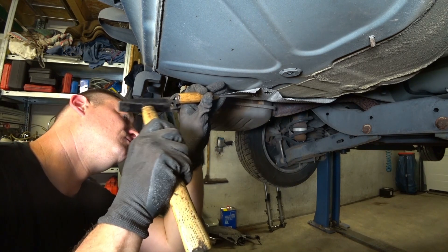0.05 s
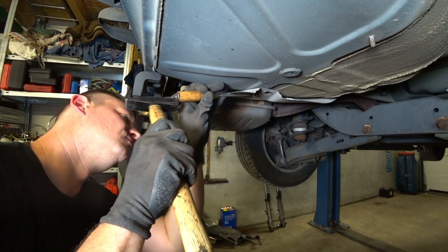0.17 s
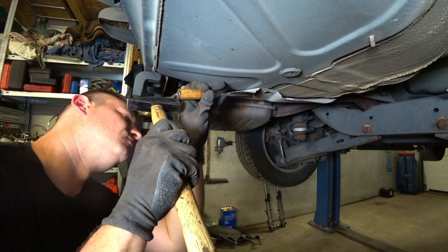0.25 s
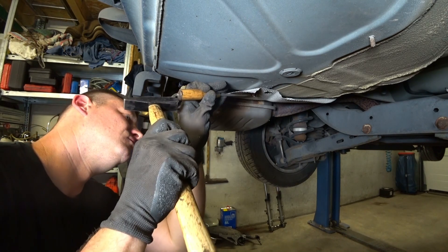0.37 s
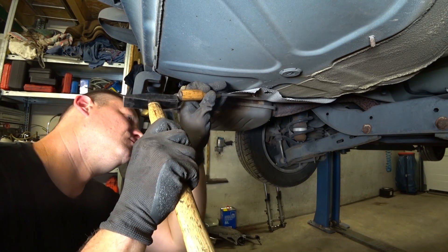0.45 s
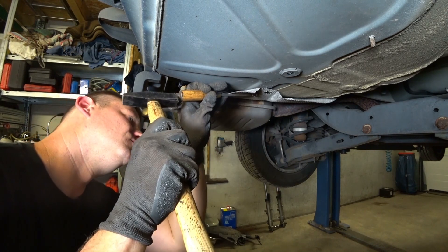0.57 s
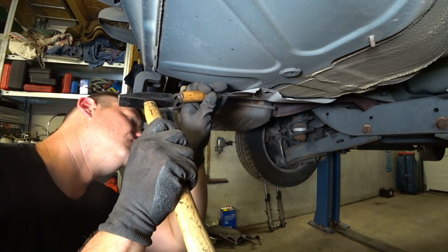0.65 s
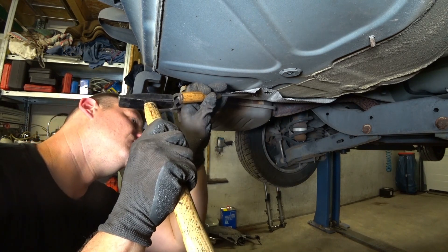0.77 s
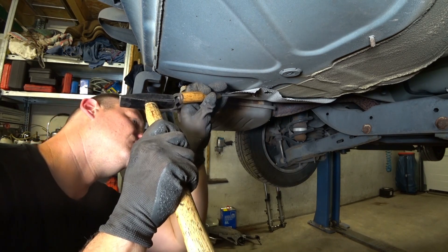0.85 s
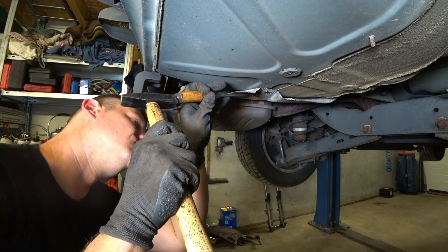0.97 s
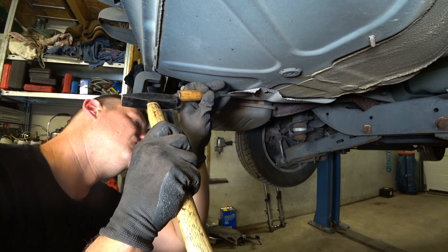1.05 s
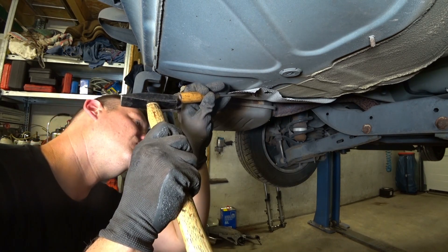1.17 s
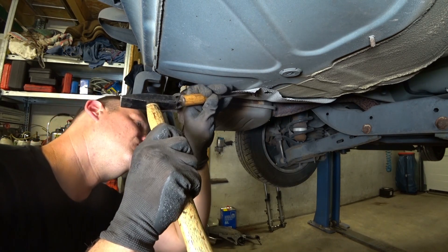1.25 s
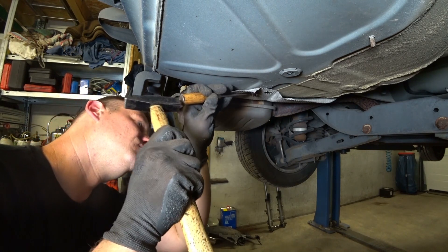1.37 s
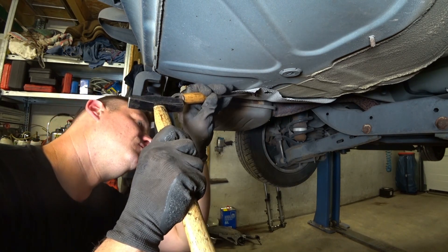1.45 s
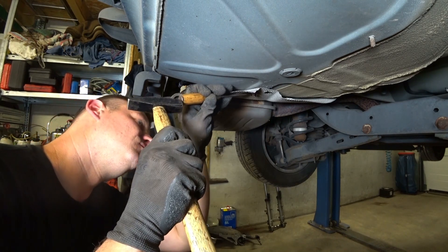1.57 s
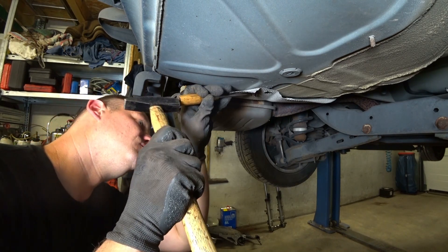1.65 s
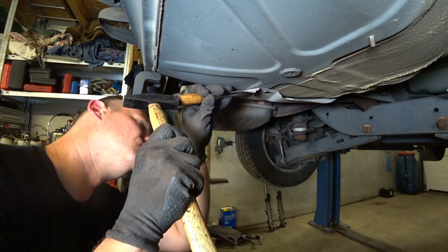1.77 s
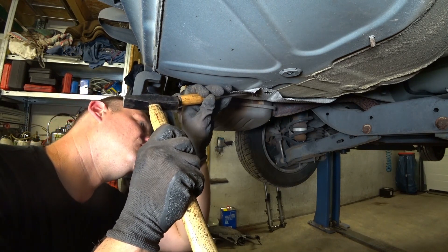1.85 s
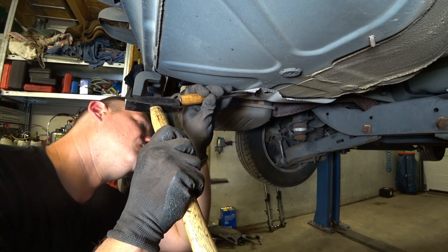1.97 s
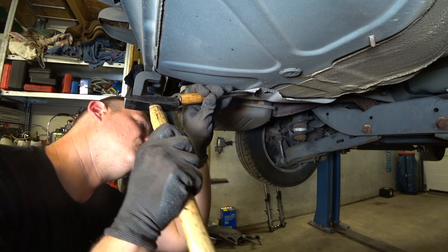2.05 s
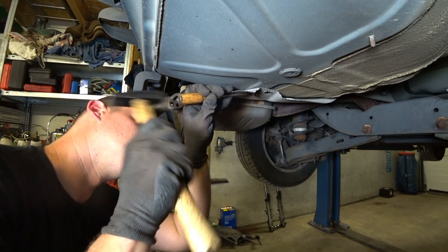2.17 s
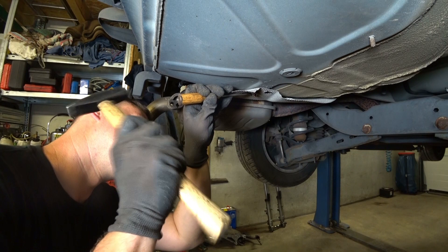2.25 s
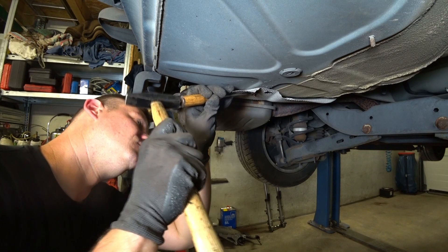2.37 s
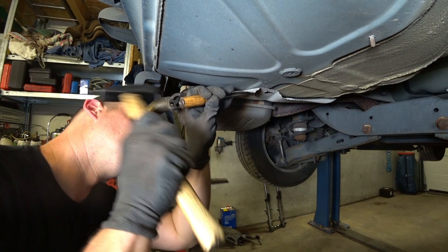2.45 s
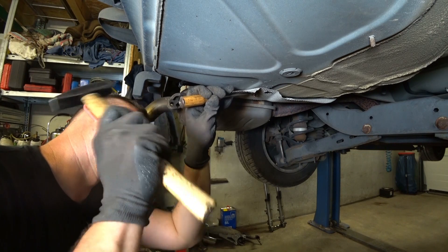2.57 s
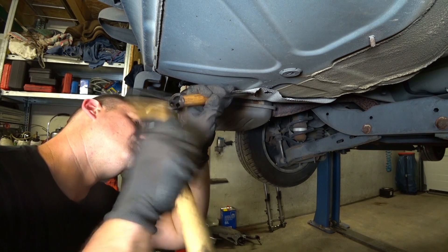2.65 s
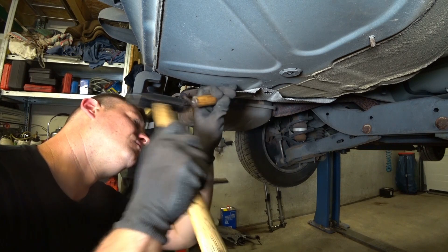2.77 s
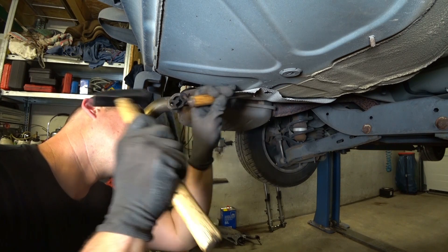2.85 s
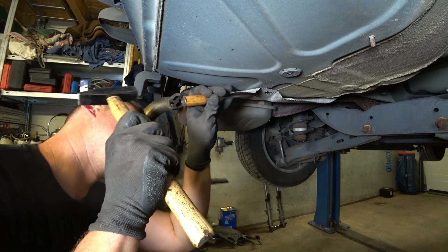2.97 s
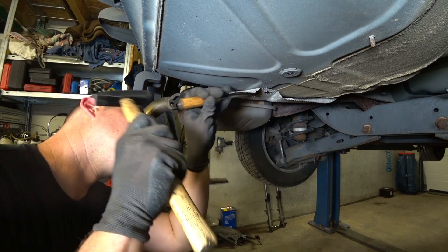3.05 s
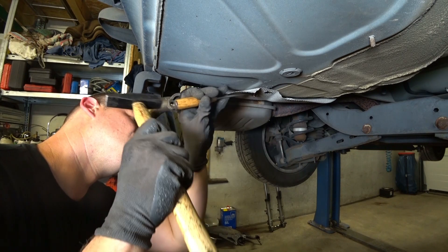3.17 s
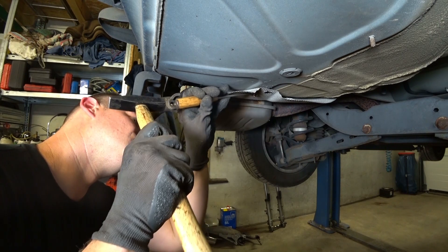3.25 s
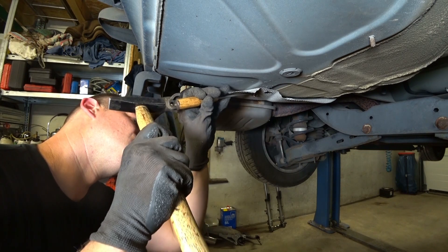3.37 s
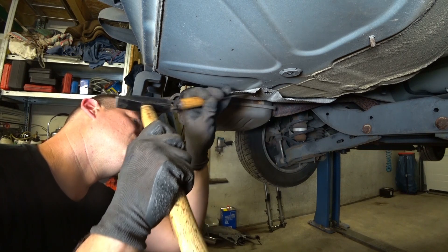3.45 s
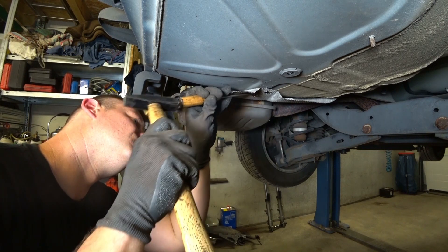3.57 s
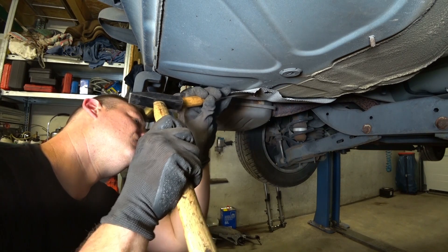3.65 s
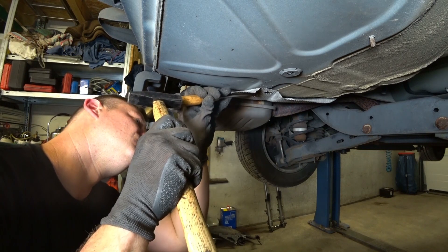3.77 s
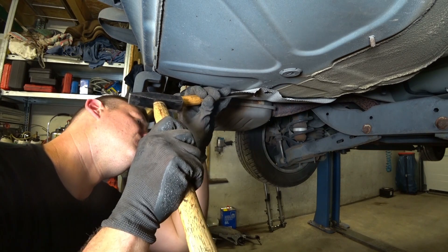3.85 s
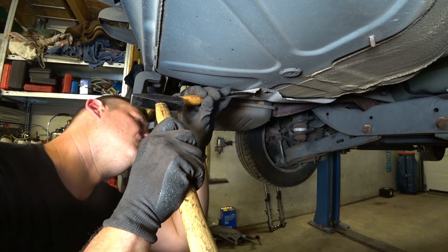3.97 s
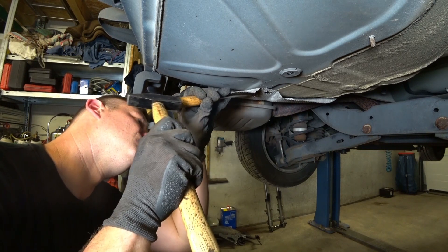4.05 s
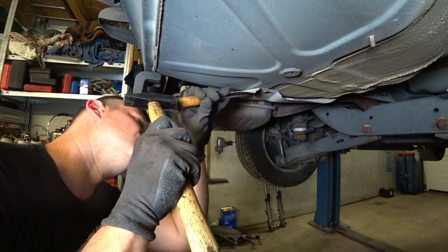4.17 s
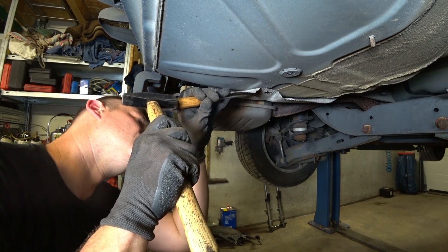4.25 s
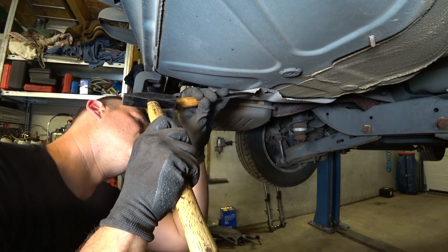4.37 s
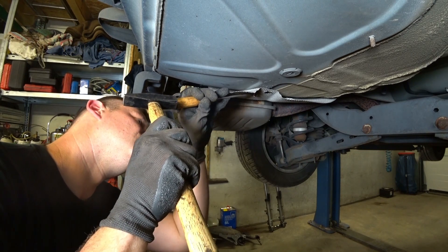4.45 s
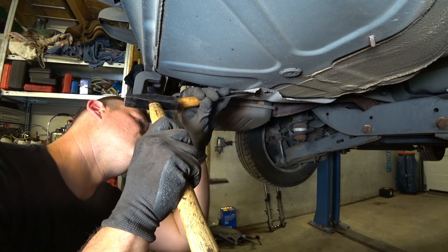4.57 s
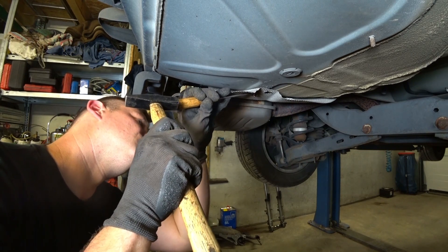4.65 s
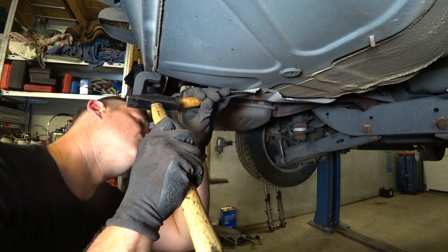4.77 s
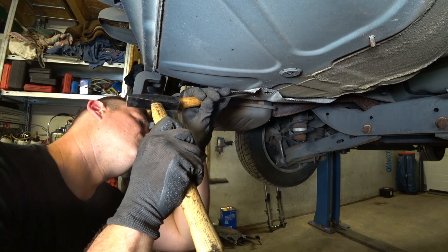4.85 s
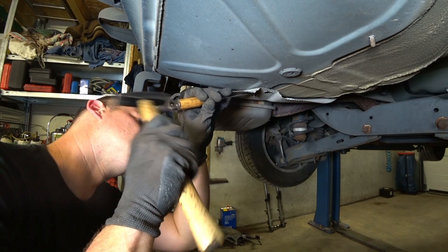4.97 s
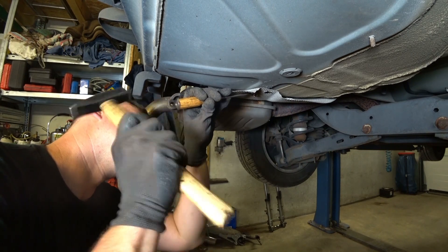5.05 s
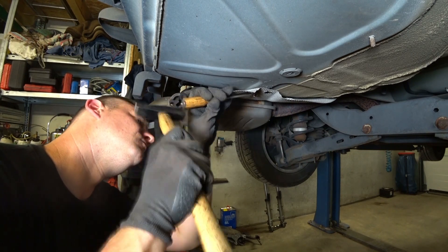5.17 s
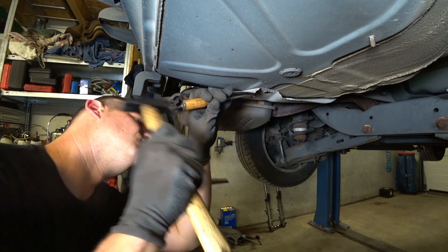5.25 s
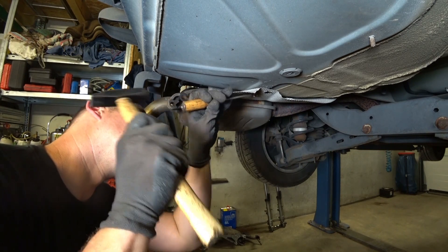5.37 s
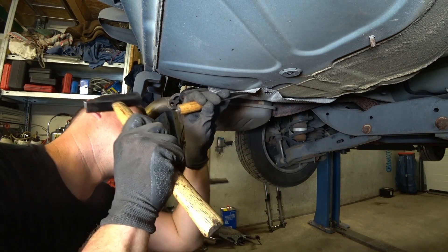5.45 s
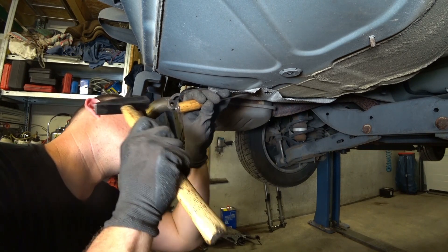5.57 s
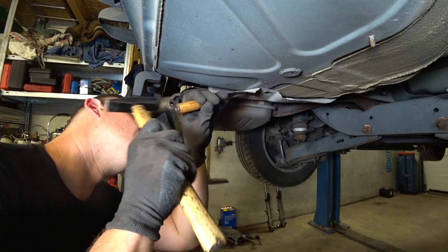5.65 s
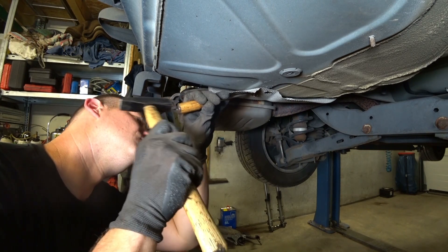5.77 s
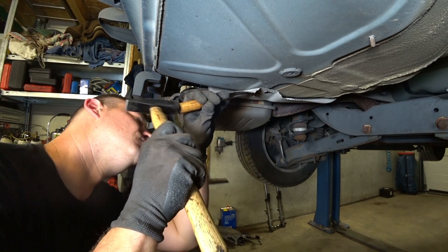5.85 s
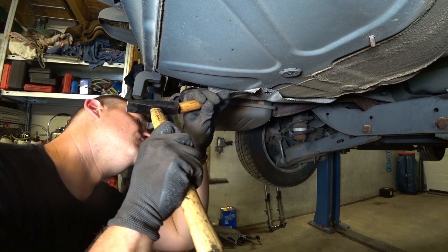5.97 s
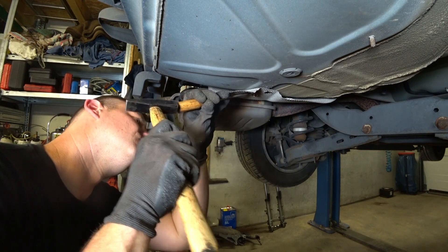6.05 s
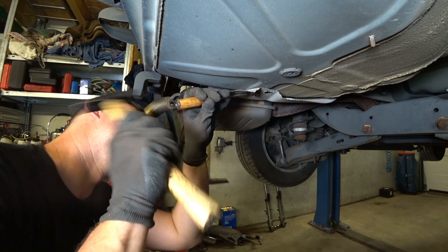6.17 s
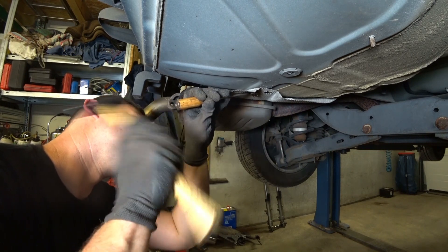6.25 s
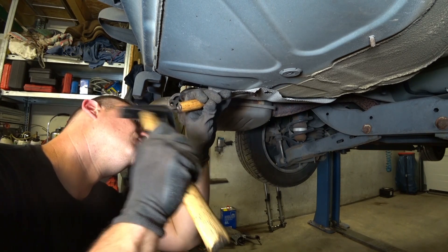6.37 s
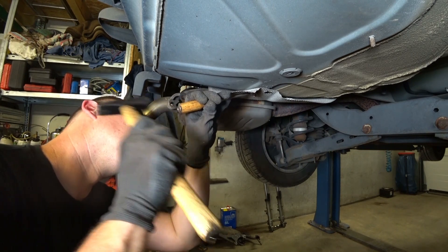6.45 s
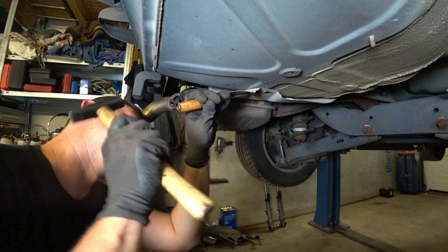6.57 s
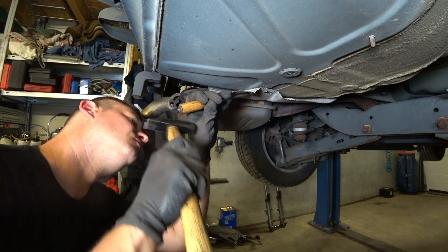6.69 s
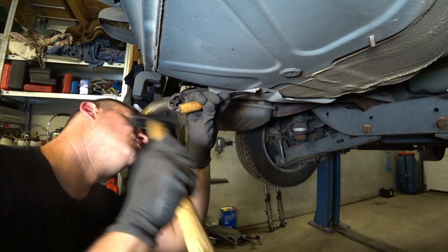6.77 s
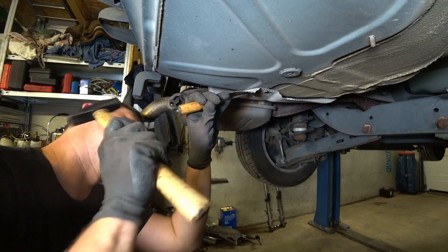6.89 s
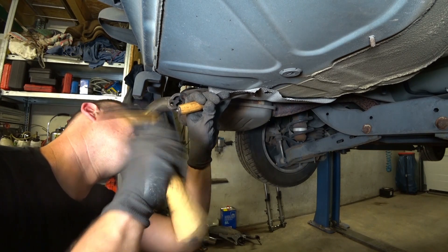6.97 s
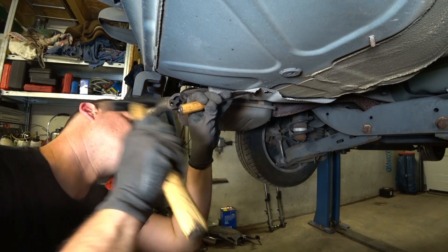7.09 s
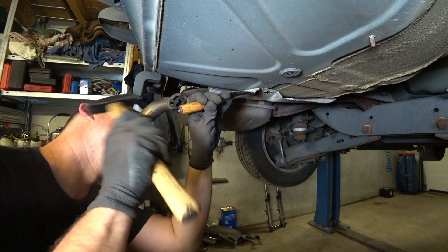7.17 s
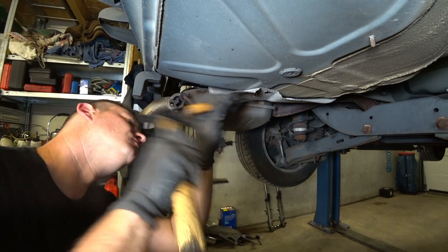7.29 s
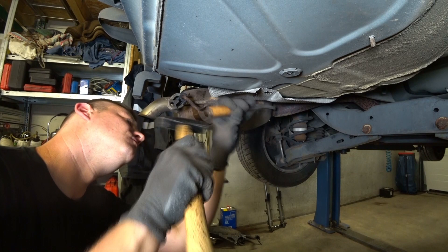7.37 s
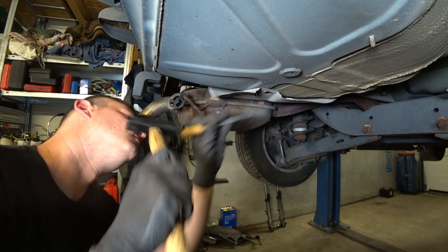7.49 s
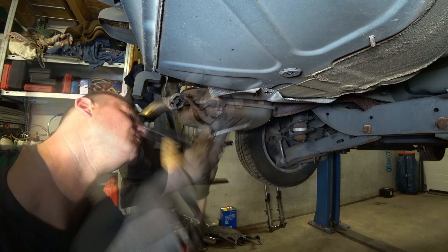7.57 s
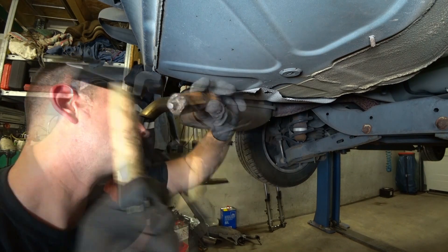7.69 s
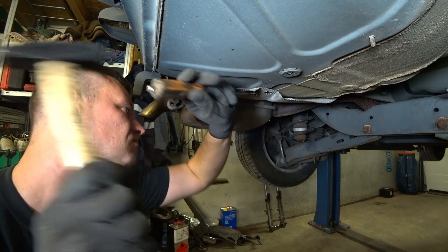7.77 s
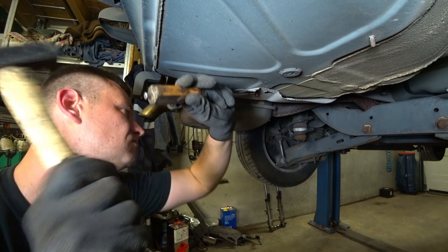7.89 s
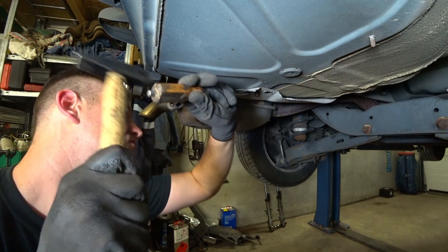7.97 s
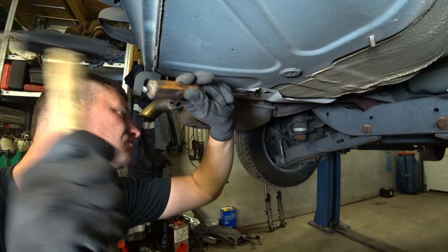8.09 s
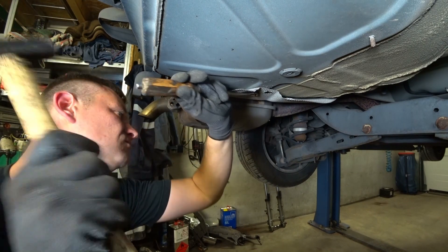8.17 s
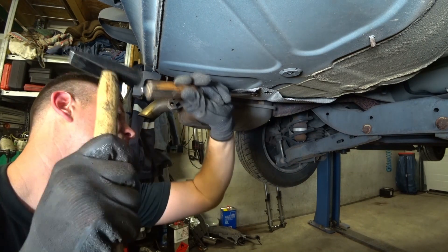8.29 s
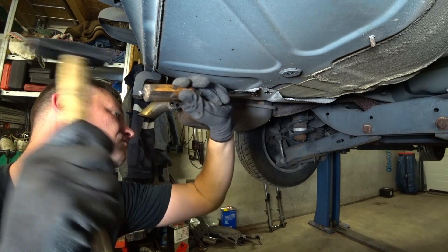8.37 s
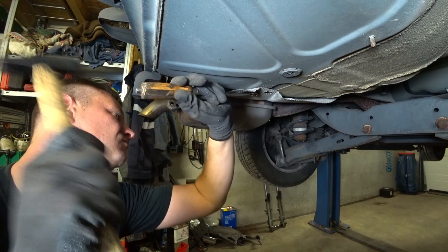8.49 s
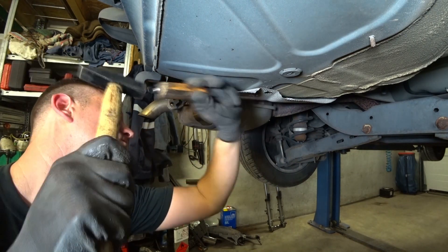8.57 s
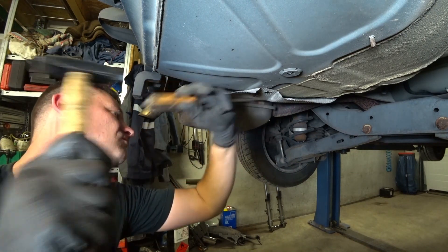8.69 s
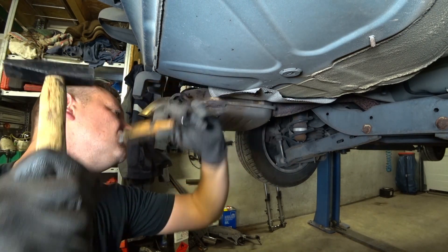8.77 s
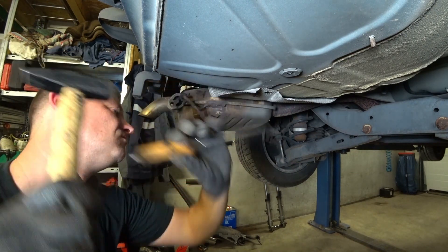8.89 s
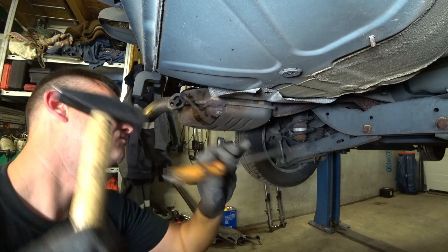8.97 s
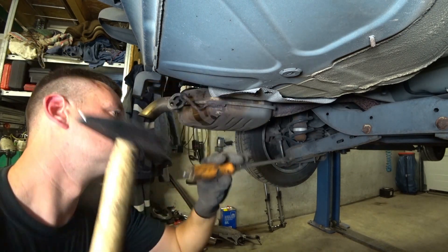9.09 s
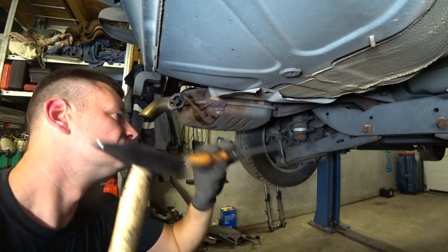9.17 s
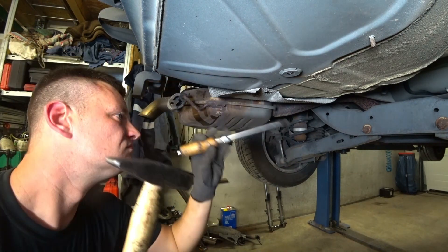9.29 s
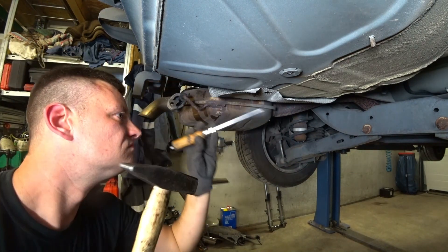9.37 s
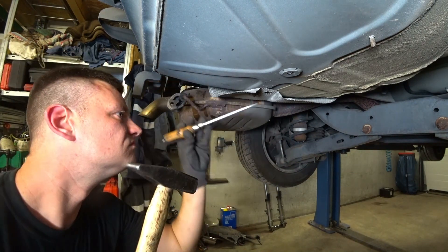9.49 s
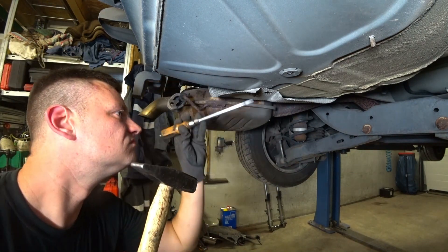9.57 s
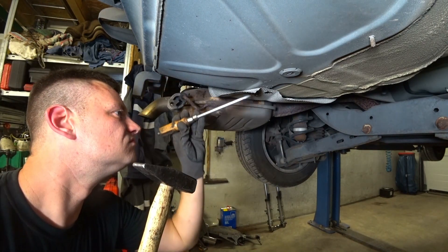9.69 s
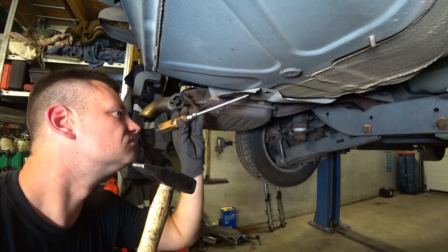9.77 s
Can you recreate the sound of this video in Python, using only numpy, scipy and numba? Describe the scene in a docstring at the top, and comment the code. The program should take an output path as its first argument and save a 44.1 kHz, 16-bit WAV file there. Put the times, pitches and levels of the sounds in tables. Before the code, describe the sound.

A hammer drives a chisel into a car's thin floor panel, with ringing metallic crashes and smaller knocks and scrapes between blows.

```python
"""Under a car in a workshop, camera microphone close to a thin floor panel.
A hammer drives a chisel into the sheet: steel cracks on steel, the panel crashes, the car body booms.
Between the runs of blows the chisel is rocked and levered in the cut, and the sheet knocks and scrapes.
A gloved hand bumps dully; the workshop's murk lies behind. At this range a hard blow clips briefly,
then the camera's gain control holds the ringing panel level until it dies away."""
import sys
import numpy as np
from scipy import signal
from scipy.fft import rfft, irfft, next_fast_len
from scipy.io import wavfile
from scipy.ndimage import map_coordinates
from numba import njit

SR = 44100
rng = np.random.default_rng(int(sys.argv[2]) if len(sys.argv) > 2 else 0)


def unload_wav(signal):
    """Save mono or channel-first audio to the path in sys.argv[1] as 16-bit WAV at rate SR, clipped to [-1, 1]."""
    wavfile.write(
        sys.argv[1],
        SR,
        np.round(np.clip(np.atleast_2d(signal).T, -1, 1) * 32767).astype(np.int16),
    )


N = 433503
RING_T = np.arange(round(1.3 * SR)) / SR  # t/s of one impact's ring


def amp(db):
    """Decibels to gain."""
    return 10 ** (np.asarray(db) / 20)


def unit(x):
    """Scale to rms 1."""
    return x / np.sqrt(np.mean(x ** 2) + 1e-20)


def along(points, hz):
    """Read (f/Hz, value) points on a log axis."""
    f, value = np.transpose(points)
    return np.interp(np.log(hz + 1), np.log(f), value)


def filtered(x, response):
    """x times a gain that depends on frequency."""
    size = next_fast_len(len(x) + 8192)
    return irfft(rfft(x, size) * response(np.fft.rfftfreq(size, 1 / SR)), size)[:len(x)]


def noise(spectrum, size=len(RING_T)):
    """Noise of rms 1, shaped by (f/Hz, level/dB) points."""
    return unit(filtered(rng.standard_normal(size), lambda hz: amp(along(spectrum, hz))))


def fade(t60, t=RING_T):
    """Exponential decay by 60 dB in t60 seconds."""
    return np.exp(-np.log(1000) * t / np.maximum(t60, 1e-3))


def add(track, s, sound):
    """Mix a sound into the track at s seconds."""
    start = max(round(s * SR), 0)
    track[start:start + len(sound)] += sound[:N - start]


# Room tone under the car: t/s, level/dB
MURK_LEVEL = [(0, -43), (2.2, -45), (4.5, -48), (6.2, -47), (9.1, -41), (9.83, -41.5)]
# Spectra of its murk and hiss: f/Hz, level/dB
MURK_SPECTRUM = [(25, -13), (70, -13), (150, -10), (212, -3), (290, -9), (400, -5), (1160, -5), (2000, -17),
                 (3250, -30), (8000, -55)]
HISS_SPECTRUM = [(300, -10), (2500, 0), (4600, -1), (7000, -6), (16000, -12)]

def room():
    """The workshop behind the close sounds: low murk, wavering a little, over a faint steady hiss."""
    t = np.arange(N) / SR
    waver_db = 1.3 * map_coordinates(rng.standard_normal(90), [t * 8])
    murk = amp(np.interp(t, *np.transpose(MURK_LEVEL)) + waver_db) * noise(MURK_SPECTRUM, N)
    return murk + amp(-58.5) * noise(HISS_SPECTRUM, N)


# The panel's ranges (thud, body, middle, clang, zing, sizzle): f/Hz
RANGE_HZ = [190, 460, 1100, 2600, 4900, 9500]

def contact_colour(centre_hz, thud, body, clang, zing, sizzle, focus_db, uneven_db):
    """One contact point's tint, dB against Hz: broad ranges, a local resonance and uneven peaks."""
    ranges = list(zip(RANGE_HZ, [thud, body, 0, clang, zing, sizzle]))
    peaks = rng.standard_normal(600)

    def tint(hz):
        local = focus_db * (np.exp(-(np.log((hz + 1) / centre_hz) / .22) ** 2) - .3)
        ripple = np.interp(55 * np.log1p(hz / 900), np.arange(len(peaks)), peaks)
        depth_db = uneven_db * along([(300, 1), (1300, .72), (3000, 1), (8000, .61)], hz)
        return along(ranges, hz) + local + depth_db * ripple
    return tint


# The floor panel's dense modes: f/Hz, level/dB
SHEET_SPECTRUM = [(40, -30), (70, -9.5), (110, -17.5), (160, -11.5), (207, -3.5), (294, -13.5), (360, -5.5),
                  (650, -6), (820, -3), (1300, -4), (2000, -11.5), (3580, -18.5), (5460, -20), (13600, -34),
                  (16000, -68)]
# Their ring times: f/Hz, t60/s
SHEET_T60 = [(100, 1.12), (400, 0.89), (1100, 0.74), (2900, 0.86), (7700, 0.71), (14000, 0.57)]

def sheet(tint):
    """The panel's countless modes merge into a noise whose treble dies first."""
    dense = filtered(noise(SHEET_SPECTRUM), lambda hz: amp(tint(hz)))
    hz, t, bands = signal.stft(dense, SR, nperseg=256)
    decay = fade(along(SHEET_T60, hz)[:, None], t)
    return signal.istft(bands * decay, SR, nperseg=256)[1][:len(RING_T)]


# The blade slipping along the sheet; the long row at 7.629 s is a blow that swells in without a sharp crack,
# played the same way: t/s, length/s, level/dB, treble/dB
SCRAPES = [(0.076, 0.05, -38.5, -3), (0.234, .22, -27, -8), (1.21, 0.076, -30, -6),
           (1.598, 0.0245, -24, -9.5), (4.029, 0.054, -30.5, -5), (4.306, .076, -40, -2.5),
           (7.629, .245, -15.5, -5)]

def scrapes(slips_per_s=1600):
    """Dense, uneven slips of the blade keep the panel ringing."""
    out = np.zeros(N)
    for s, length, db, treble in SCRAPES:
        size = round(length * SR)
        tint = contact_colour(1120, -8.5, 1, treble - 1, treble, treble - 6, focus_db=3.5, uneven_db=3)
        slips = rng.standard_normal(size) * (rng.random(size) < slips_per_s / SR)
        slips *= signal.windows.tukey(size, .3)
        rasp = signal.fftconvolve(slips, sheet(tint) * (fade(.14) + amp(-5)))
        add(out, s, amp(db) * rasp / (np.std(rasp[:size]) + 1e-9))
    return out


def modes(table, tint, scatter_db, drift):
    """Damped sines, each struck at a new strength; the pitch wanders slightly as the metal flexes."""
    hz, db, t60 = np.transpose(table)
    gains = amp(db + tint(hz) + scatter_db * rng.standard_normal(len(hz)))
    knots = np.linspace(0, RING_T[-1], 60)
    out = np.zeros(len(RING_T), np.float32)
    for f, gain, life in zip(hz, gains, t60):
        wander = np.cumsum(drift * f * rng.standard_normal(len(knots))) * knots[1] + rng.random()
        phase = 2 * np.pi * (f * RING_T + np.interp(RING_T, knots, wander))
        out += gain * np.sin(phase.astype(np.float32)) * fade(life)
    return out


# The floor panel's strong modes: f/Hz, level/dB, t60/s
PANEL_MODES = [(136.6, -26.5, 1.3), (193.7, -10.5, 0.5), (214.8, -10.5, 0.52), (272.6, -21.5, 1.1),
               (353.4, -23, 1.54), (441, -13, 0.61), (516.6, -18, 0.87), (591.4, -17, 0.99),
               (697, -57, 0.29), (840, -15, 0.48), (977, -49, 1), (1008, -17.5, 0.44), (1200, -10.5, 0.5),
               (1228, -18.5, 0.63), (1450, -16, 0.18), (1510, -13, 0.41), (1660, -22.5, 0.86),
               (1763, -11.5, 0.36), (2030, -15, 0.29), (2200, -37, 0.17), (2660, -20, 0.61),
               (2900, -32, 1.1)]

def panel_tones(tint, scatter_db, drift):
    """The separate pitches that stand out of the struck panel's ring."""
    return modes(PANEL_MODES, tint, scatter_db, drift)


def blade(centre_hz, width_hz=480):
    """A cluster of close modes where the blade bites the sheet."""
    white = rng.standard_normal(len(RING_T))
    return unit(filtered(white, lambda hz: np.exp(-((hz - centre_hz) / width_hz) ** 2)))


# The chisel levered in the cut, close by; the row at 5.855 s is a light hammer tap and the one at 5.442 s a
# swelling scrape, played the same way: t/s, level/dB, resonance f/Hz, thud/dB, brightness/dB
KNOCKS = [(0.185, -20.5, 804, -2.5, -26), (0.289, -38.5, 1100, -21, 5), (0.42, -11.5, 1600, -18, -17),
          (0.51, -23.5, 1670, -18, -9), (.688, -14, 1310, -14, -13), (.889, -27, 1680, -14, -20),
          (.941, -8.5, 1460, -15, -9), (1.238, -22, 1140, -13, -19.5), (1.457, -15, 1510, -16, -33),
          (1.618, -13.5, 1080, -12.5, -13.5), (1.725, -19.5, 800, -8, -26.5), (1.89, -29.5, 770, -31, -17),
          (1.946, -12, 1960, -10, -21), (2.12, -23.5, 1240, -23, -28.5), (3.113, -15, 1620, -23, -9.5),
          (3.188, -17.5, 1540, -13, -18.5), (3.222, -19, 1070, -1, -29), (3.454, -12.5, 916, -35, -14),
          (3.694, -29, 1030, 4, -9), (4.048, -31, 1230, -18, -25), (4.615, -22, 690, -9, -60),
          (4.768, -34.5, 605, 25, -46), (4.9104, -21, 960, -14, -11.5), (5.442, -15.5, 1230, -11.5, -16.5),
          (5.654, -17, 1160, -4, -16.5), (5.756, -21.5, 1100, -6, -18.5), (5.788, -18.5, 1130, -11, -26),
          (5.816, -31, 1380, 1, -4), (5.855, -21, 1480, 9.5, 1.5), (8.115, -44, 690, -4, 20.5),
          (8.18, -17, 1170, -16, -9.5), (9.645, -23.5, 497, 11, -1.5), (9.738, -31, 1200, 4, 3)]

def knocks():
    """The sheet creaks, then snaps against the blade: a tick, a short clank and a weaker ring."""
    out = np.zeros(N)
    lead = round(.03 * SR)
    for s, db, centre_hz, thud, bright in KNOCKS:
        ring_db = -9 + .3 * min(bright + 19.5, 0)  # a dull knock rings less
        tint = contact_colour(centre_hz, thud, body=2.5 + .29 * thud, clang=8 + .79 * bright,
                              zing=bright, sizzle=-2.5 + 1.05 * bright, focus_db=7, uneven_db=5)
        dense = sheet(tint)
        clank = dense * (amp(3) * fade(.011) + fade(.27) + amp(ring_db + .5))  # jolt, clank, tail
        tones = panel_tones(tint, scatter_db=2.5, drift=.0045) * (fade(.2) + amp(ring_db + 7))
        edge = amp(-18 + min(bright, 0)) * blade(4400) * fade(.69)  # bright knocks wake the blade
        treble = noise([(800, -20), (2500, -11.5), (7000, -10), (15000, -22)])
        tick = amp(-.5) * filtered(treble, lambda hz: amp(tint(hz))) * fade(.062)
        creak = amp(-8.5) * (dense * fade(.028))[:lead][::-1]  # swells up to the snap
        snap = (clank + tones + edge) * (1 - fade(.005)) + tick
        add(out, s - lead / SR, amp(db) * np.concatenate([creak, snap]))
    return out


# Thin tones of hammer head and chisel shank, deep tones of the car body: f/Hz, level/dB, t60/s
STEEL_MODES = [(2509, -37, .5), (2773, -36, .5), (8230, -49, .6), (8995, -49, .6), (9528, -43, .7),
               (11754, -46, .65)]
CAR_BODY_MODES = [(83, -22.5, 1.5), (86.5, -31, 1.0), (72, -35, 1.0)]
# Hammer blows at close range; grip is how firmly the blade sits in the sheet:
# t/s, level/dB, resonance f/Hz, thud/dB, brightness/dB, grip/dB, blade f/Hz
BLOWS = [(2.3307, 5, 814, 4.5, -3.5, 8, 4490), (2.6774, 15.5, 1115, -16.5, -11, -16, 4400),
         (3.458, 0, 1250, -11, -15, -26, 4520), (5.145, 7, 890, -1, -4.5, 2, 4480),
         (6.2795, 4, 830, 3, -3, 4, 4460), (6.6588, 2, 770, 4.5, -14.5, 6.5, 4260),
         (6.9935, 1.5, 1030, 0.5, -0.5, 1.5, 4320), (7.2971, -2, 960, 4.5, 3.5, -16, 4060),
         (7.959, 1, 740, -.5, -15, -3, 4630), (8.253, 5, 870, -5.5, -4, -41, 4140),
         (8.5358, 3, 1090, -1.5, -1, -35, 4380)]

def blows():
    """Steel cracks on steel, the panel crashes; a firmly seated blade rings and makes the car boom."""
    out = np.zeros(N)
    for s, db, centre_hz, thud, bright, grip, blade_hz in BLOWS:
        tint = contact_colour(centre_hz, thud, body=1.1 + .49 * thud, clang=4 + .8 * bright,
                              zing=bright, sizzle=bright, focus_db=5, uneven_db=3.5)
        burst = noise([(80, -60), (400, -55), (1200, 22), (3000, 7), (7000, -2.5), (15000, -28)])
        crack = amp(10) * burst * fade(.0094)
        deep_db = .28 * min(grip, 0)  # a loose blade hardly stirs the panel's deepest range
        dense = sheet(lambda hz: tint(hz) + along([(80, deep_db), (200, 0)], hz))
        crash = dense * (1 + amp(7) * fade(.043))
        tones = amp(-.5) * panel_tones(tint, scatter_db=1, drift=.0064)
        shank = modes(STEEL_MODES, tint, scatter_db=3, drift=.003)
        edge = amp(-10.5 + 1.26 * bright + .24 * grip) * blade(blade_hz) * fade(.93)
        # the boom is too deep to depend on the contact point
        boom = amp(grip) * modes(CAR_BODY_MODES, np.zeros_like, scatter_db=1, drift=.01)
        add(out, s, amp(db - 6) * (crack + crash + tones + shank + edge + boom))
    return out


# The gloved hand against the panel: t/s, level/dB
GLOVE_BUMPS = [(4.828, -31), (9.457, -24), (9.491, -26.5), (9.71, -23)]

def glove_bumps():
    """A soft contact stirs only the panel's low range, briefly."""
    out = np.zeros(N)
    for s, db in GLOVE_BUMPS:
        thump = noise([(100, -13), (210, 11), (290, 1), (500, -32), (6000, -64)])
        add(out, s, amp(db) * thump * fade(.12) * (1 - fade(.018)))
    return out


def scene():
    """Everything that reaches the one microphone under the car."""
    return (blows() + knocks() + scrapes() + glove_bumps() + room())[None]


@njit
def gain_control(x, limit, duck_db_per_s, recover_db_per_s):
    """The camera's gain in dB: it falls fast while the output is over the limit and climbs back slowly."""
    gain_db, now = np.zeros(len(x)), 0.
    for i in range(len(x)):
        if abs(x[i]) * 10 ** (now / 20) > limit:
            now -= duck_db_per_s / SR
        else:
            now = min(now + recover_db_per_s / SR, 0.)
        gain_db[i] = now
    return gain_db


# Treble roll-off of the camera microphone: f/Hz, level/dB
MIC_RESPONSE = [(9000, 0), (13500, -.5), (15900, -5)]

def record(dry, low_cut_hz=28, top_hz=15900):
    """The camera, close to the blows: gain control, overload, low cut, roll-off and band limit."""
    x = dry[0]
    held = x * amp(gain_control(x, limit=.79, duck_db_per_s=4480, recover_db_per_s=82))
    clipped = held / (1 + np.abs(held / .97) ** 7) ** (1 / 7)
    lean = signal.lfilter(*signal.butter(1, low_cut_hz, "high", fs=SR), clipped)
    return filtered(lean, lambda hz: amp(along(MIC_RESPONSE, hz)) * (hz < top_hz))[None]


dry = scene()
out = record(dry)
unload_wav(out)
```